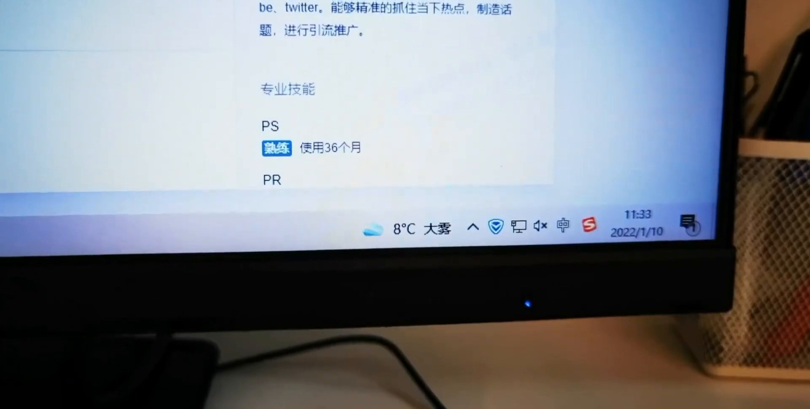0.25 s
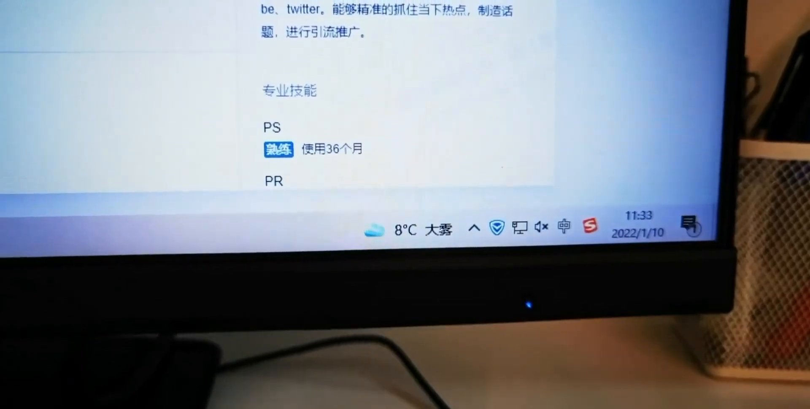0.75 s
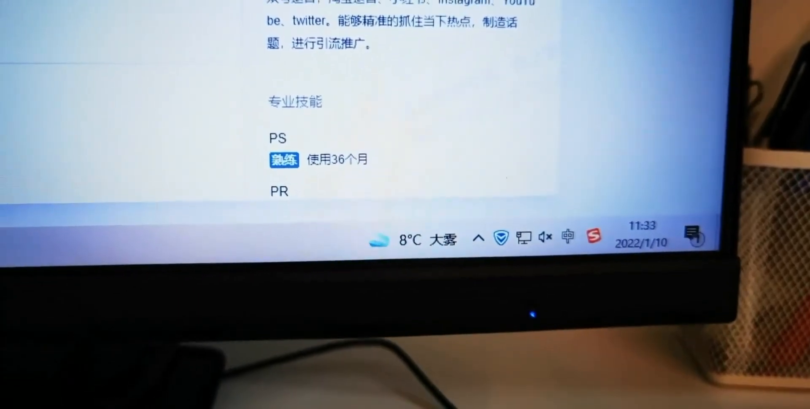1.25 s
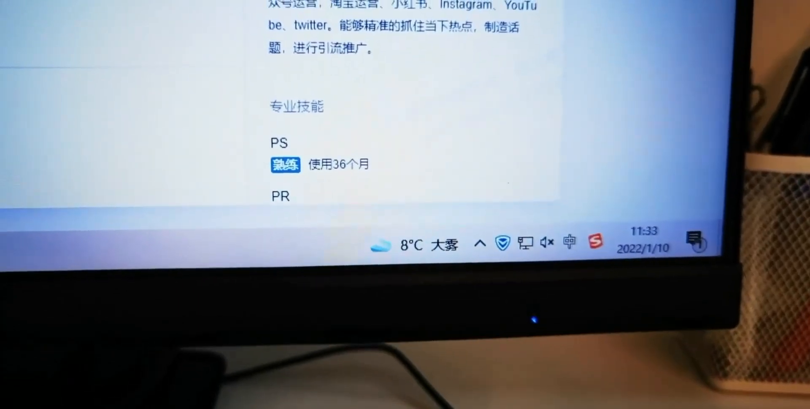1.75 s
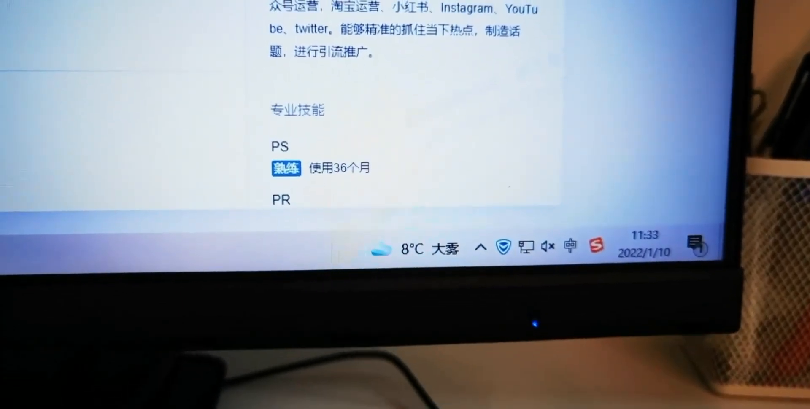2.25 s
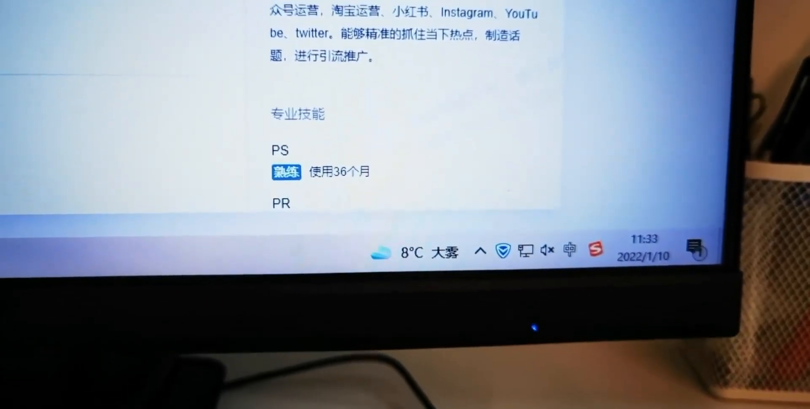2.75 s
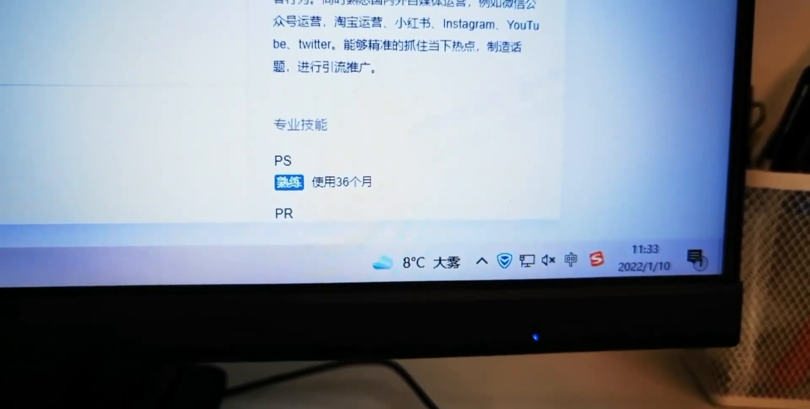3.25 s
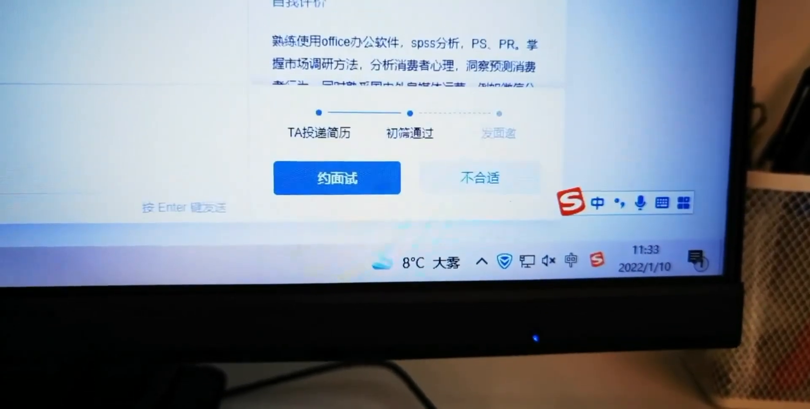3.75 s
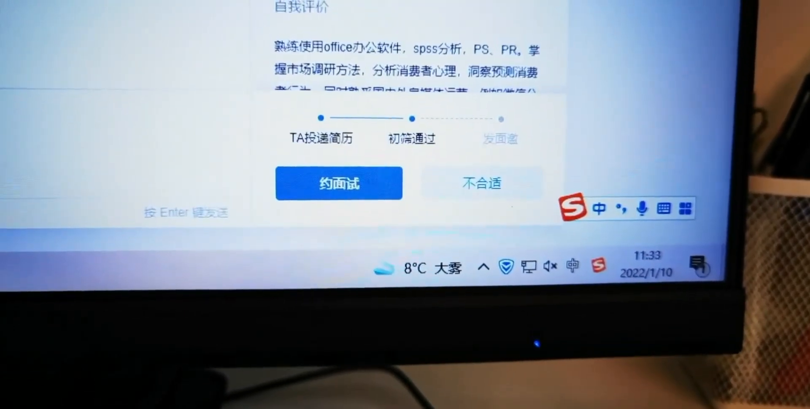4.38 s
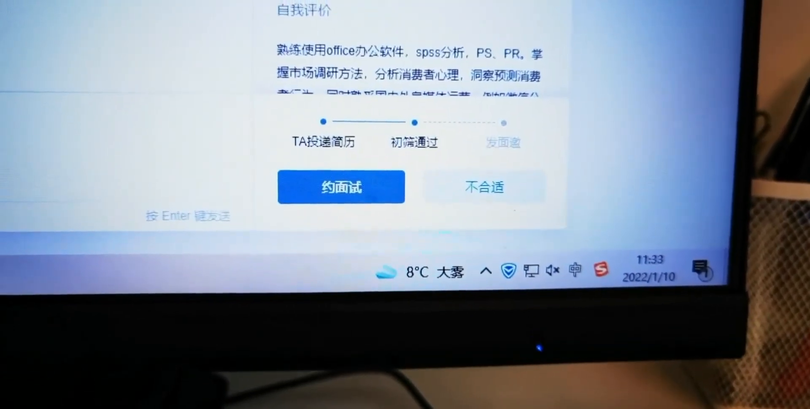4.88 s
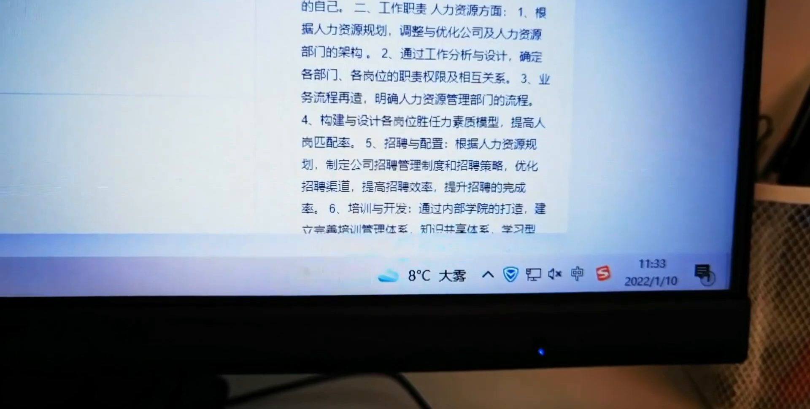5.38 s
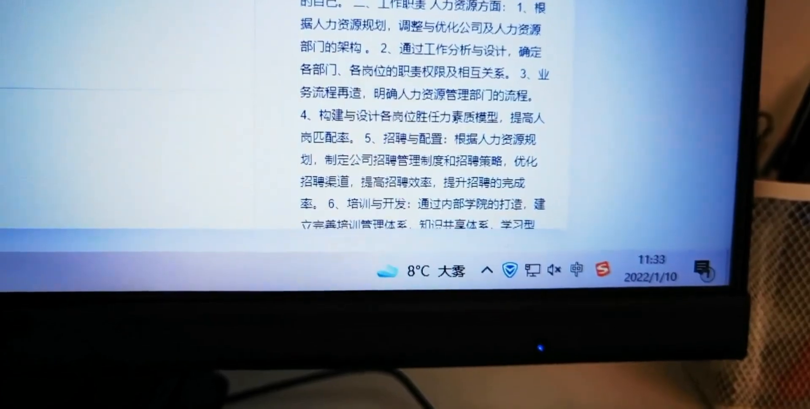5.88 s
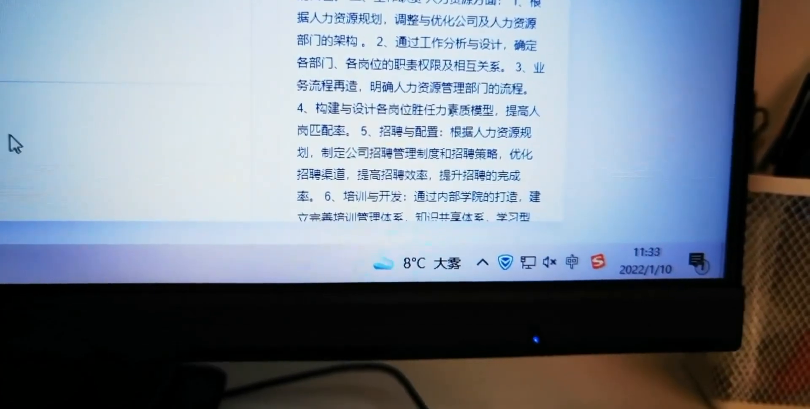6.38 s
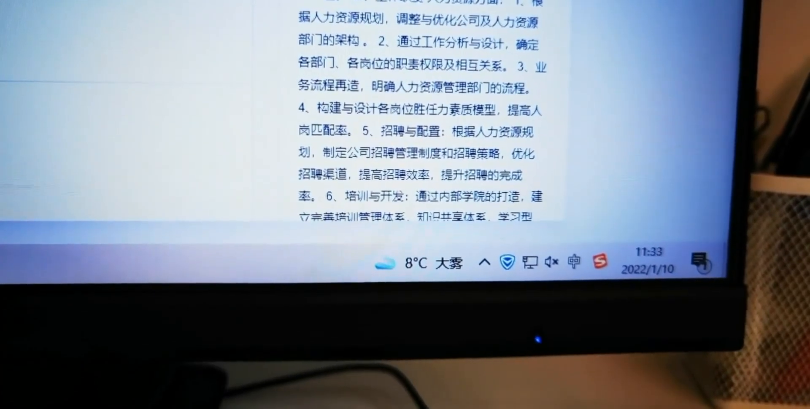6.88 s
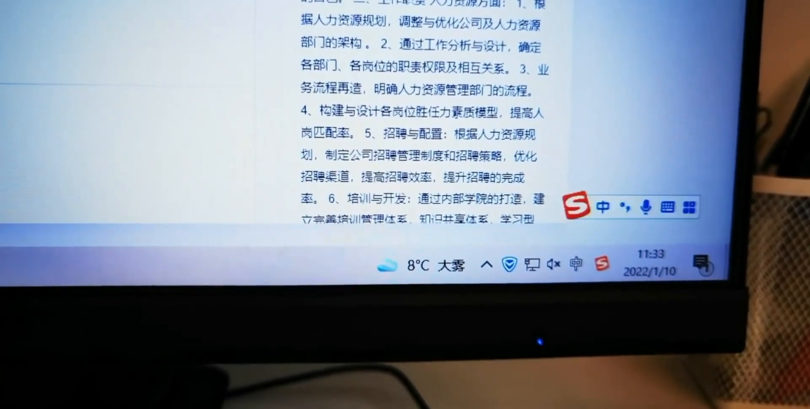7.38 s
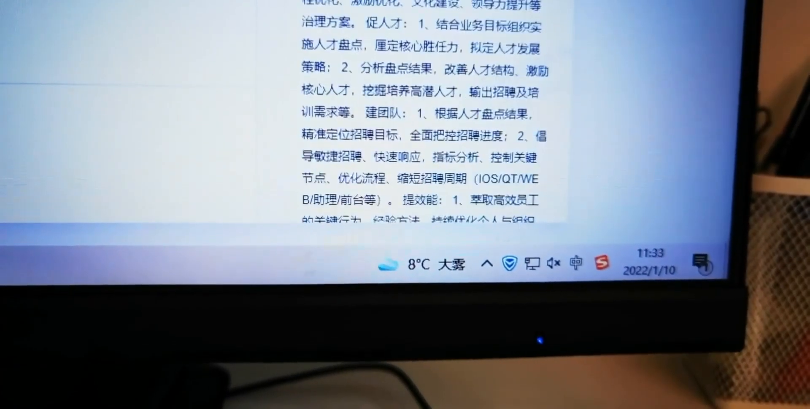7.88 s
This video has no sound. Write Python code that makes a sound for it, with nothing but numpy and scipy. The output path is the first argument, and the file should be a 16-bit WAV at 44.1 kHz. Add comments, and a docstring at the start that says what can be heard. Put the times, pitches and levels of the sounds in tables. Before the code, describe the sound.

Four crisp double-snap mouse clicks, with faint ticks and soft sliding hisses between them, over steady office ventilation.

```python
"""A quiet office, a desk just left of a handheld camera's stereo microphone: a computer mouse is clicked
and nudged. Each click is a press that rings the switch spring and a duller release, among small ticks.
The feet hiss as they slide and squeak once; two soft, airy swells of hiss sit near the centre.
Behind it, ventilation rumbles and hums. A limiter flattens the clicks and ducks the room after them;
the sound drops out briefly near the start."""
import sys
import numpy as np
from scipy import signal
from scipy.fft import rfft, irfft, next_fast_len
from scipy.io import wavfile
from scipy.ndimage import uniform_filter1d, minimum_filter1d, map_coordinates

SR = 44100
rng = np.random.default_rng(int(sys.argv[2]) if len(sys.argv) > 2 else 0)


def unload_wav(signal):
    """Save mono or channel-first audio to the path in sys.argv[1] as 16-bit WAV at rate SR, clipped to [-1, 1]."""
    wavfile.write(
        sys.argv[1],
        SR,
        np.round(np.clip(np.atleast_2d(signal).T, -1, 1) * 32767).astype(np.int16),
    )


N = 358488

# ventilation rumble: f/Hz, relative density/dB
RUMBLE_SPECTRUM = [(12, -48.5), (20, -20), (43, -7), (69, -10.5), (84, -8), (103, -8.5), (129, -6),
                   (162, -7), (399, -13), (464, -19.5), (529, -20.5), (615, -27), (801, -24.5),
                   (1800, -40.5), (2340, -37), (3960, -120)]
# swells of the rumble: middle t/s, half length/s, rise/dB
RUMBLE_SWELLS = [(0.34, 0.085, 2.5), (1.4, 0.22, 5.5), (2.748, 0.36, 1.5)]
# airy hiss of the room: f/Hz, relative density/dB
AIR_SPECTRUM = [(500, -5), (1500, -2), (2400, -1), (3800, -5.5), (5300, -3), (7000, -2), (8800, 4),
                (10000, -2.5), (11000, -7.5), (12000, -28), (15500, -25.5)]
# mains and fan tones: f/Hz, level/dB
HUM_TONES = [(100, -61), (161.8, -63.5), (259, -74.5), (518, -76.5), (551.5, -86), (678.5, -86.5)]
# likeness of the room noise across the microphone pair: f/Hz, correlation
MIC_COHERENCE = [(30, 1), (130, 0.88), (260, 0.88), (400, 0.63), (600, -0.055), (1000, -0.31),
                 (2000, -0.13), (16000, 1)]
# decay of the office: f/Hz, t60/s
ROOM_DECAY = [(500, 0.99), (5000, 0.35), (8500, 0.17), (11000, 0.17), (13000, 0.13), (16000, 0.09)]
# desk, screen and wall reflections: delay/s, level/dB
ROOM_ECHOES = [(.0046, -25), (.0108, -36), (.0135, -31), (.031, -40), (.0425, -38)]
# colour of the room's tail, dipping where the shell radiates poorly: f/Hz, gain/dB
TAIL_COLOUR = [(500, 0), (3000, 2), (4300, -1), (4900, -10), (5300, -11), (5800, -6), (6500, -5),
               (7600, -1), (8400, -2), (9100, 2), (12000, -1), (14500, 2)]

# whistle of a sticking foot: f/Hz, relative level/dB
SQUEAK_TONES = [(5790, 0), (5480, -15), (6490, -11)]
# bright band of a swell, in a slide the feet rubbing on the desk: f/Hz, relative density/dB
BRIGHT_SPECTRUM = [(500, -34), (4200, -27), (4800, -21), (5400, -13), (6500, -14), (7150, -8), (7550, -8),
                   (8100, -3), (8650, 1), (9300, -5.5), (10200, -16), (11200, -24), (12300, -46),
                   (14500, -42), (16000, -50)]
# low band of a swell, in a slide the desk top answering: f/Hz, relative density/dB
LOW_SPECTRUM = [(150, -27), (500, 14.5), (800, 1), (1200, -4.5), (2000, -8), (3000, -7.5), (4500, -10),
                (7200, -5.5), (9500, -5), (11300, -15), (12500, -33), (14500, -21), (16000, -34)]
# mouse slides on the left, and two soft, airy swells near the centre (from 2.024 s and 6.63 s):
# start t/s, end t/s, bright band/dB, low band/dB, left minus right/dB, close reflection/dB
HISS_SWELLS = [(0.3, 0.528, -58, -78, 9, -16), (1.164, 1.417, -52, -77, 13, -16),
               (1.374, 1.493, -53.5, -73, 13, -18), (2.024, 2.49, -52, -63, 5, -6),
               (3.023, 3.33, -52.5, -76, 11, -18), (5.57, 5.784, -60, -74, 6, -16),
               (6.072, 6.363, -53, -73.5, 11, -22), (6.317, 6.567, -57.5, -66, 3.5, -9),
               (6.504, 6.7, -53.5, -67, 7, -9), (6.63, 6.9, -62.5, -64, 3.5, -6),
               (7.1, 7.264, -57, -71, 6, -14), (7.366, 7.541, -63, -87, 5, -14)]

# plastic chatter of the button: f/Hz, relative density/dB
CHATTER_SPECTRUM = [(300, -55), (1600, -56.5), (3000, -36.5), (3900, -37), (4800, -38.5), (6000, -19.5),
                    (7000, -15.5), (8000, 3.5), (8700, 7), (9450, -7.5), (10000, -14), (11300, -26),
                    (12500, -46.5)]
# broad, quickly damped resonance of the shell: f/Hz, relative density/dB
SHELL_SPECTRUM = [(800, -44), (2000, -54), (3700, -48), (4300, -32), (4650, -16), (4900, -4), (5250, 1.5),
                  (5800, -4), (6500, -5), (7300, -5), (8000, -11), (12000, -50)]
# sharp crack of the contact: f/Hz, relative density/dB
CRACK_SPECTRUM = [(2000, -76.5), (7000, -11.5), (9000, -23.5), (10700, 18), (12500, 6), (15500, -6)]
# hollow thud of the body on the desk: f/Hz, relative density/dB
THUD_SPECTRUM = [(200, -17.5), (480, -4), (750, 1), (1200, -5.5), (2200, -5), (3000, -4.5), (3600, -4.5),
                 (4300, -13), (8000, -48.5)]
# presses that ring the case: t/s, level/dB, f/Hz
CASE_TONES = [(1.002, -60, 3340), (5.032, -55, 2930)]
# button going down; shell, crack and thud are relative to the chatter:
# t/s, peak/dB, swell/s, shell/dB, crack/dB, thud/dB, spring f/Hz, lever f/Hz, left minus right/dB
BUTTON_PRESSES = [(1.0016, 0.5, 0.0011, -26, -48, -43, 8300, 5480, 16),
                  (2.9237, -2.5, 0.00084, -12, -26, -36, 8410, 6050, 6.5),
                  (5.029, -4.5, 0.0014, -14.5, -32, -35, 8330, 5240, 10.5),
                  (7.0094, -0.5, 0.0012, -17, -22, -42.5, 8300, 5220, 14)]
# button coming up: columns as BUTTON_PRESSES
BUTTON_RELEASES = [(1.0858, -2.5, 0.00077, -6.5, -24, -65, 9140, 5070, 9.5),
                   (3.0152, -5.5, 0.00097, -3.5, -15, -57, 9350, 4790, 8),
                   (5.1242, -1.5, 0.00097, -11, -20, -59, 8400, 4810, 11.5),
                   (7.1170, 0, 0.00064, -7, -18.5, -54, 8960, 5280, 9.5)]
# small plastic ticks: light taps, a tick just before one press, a faint echo after another;
# columns as BUTTON_PRESSES
PLASTIC_TICKS = [(.2705, -42, 0.0014, -9, -28, -32, 8480, 5560, 10),
                 (.4723, -33, 0.00066, -4, -25, -18, 8900, 6240, 11),
                 (1.1550, -40, .0008, 2, -15, -27, 8600, 5400, 12),
                 (1.3355, -38, .0006, -14, -25, -28, 8700, 5500, 10),
                 (1.3428, -29, 0.00024, -14, -2, -28, 8700, 6340, 18),
                 (1.3455, -28, 0.0008, -16, -22, -33, 8980, 6500, 14),
                 (1.3792, -36, .0004, -18, -31, -34, 8800, 5500, 14),
                 (1.4005, -40.5, .0004, -10, -30, -28, 8700, 5300, 12),
                 (1.5648, -28, 0.00091, -8, -42, -27, 8560, 6030, 8.5),
                 (1.9588, -52, 0.00061, -9, -29, -25, 8700, 5530, 5),
                 (2.9217, -23, .0007, 4, -30, -25, 7900, 5300, 12),
                 (4.5450, -51, 0.00059, -8, -22, -10, 9400, 5300, 1),
                 (4.7763, -46, 0.00035, -1, -18, 6, 8500, 5500, 3),
                 (5.7270, -38.5, 0.0016, -9, -40, -19, 7920, 5300, 7),
                 (6.0108, -45.5, .00077, -11, -26, -12.5, 9040, 5500, 9),
                 (6.5712, -17, 0.00075, -10.5, -34, -35, 8700, 4970, 9.5),
                 (7.0516, -27, 0.00092, -32, -34.5, -35, 8330, 5400, 16),
                 (7.2180, -33.5, 0.0014, -7.5, -18, -24, 8760, 5400, 8),
                 (7.4252, -45.5, 0.00041, -14, -30, -22, 8710, 5500, 8),
                 (7.8220, -52, 0.0007, -20, -25, -19.5, 8880, 5400, 5)]
# mouse set down on the desk: columns as BUTTON_PRESSES
DESK_KNOCKS = [(3.0900, -27.5, 0.001, 12, -38, -12, 7900, 5800, 12),
               (6.3946, -24, 0.0009, 3.5, -20, -15, 7800, 6530, 14)]
# brief dropout of the whole sound: t/s, gain/dB
DROPOUT_CURVE = [(.058, -4), (.064, -15), (.08, -32), (.1, -62), (.23, -62), (.242, -24), (.27, -11),
                 (.31, 0)]


def amp(db):
    """Decibels to gain."""
    return 10 ** (np.asarray(db) / 20)


def unit(x):
    """Scales each channel to rms 1."""
    return x / np.sqrt(np.mean(x ** 2, axis=-1, keepdims=True) + 1e-20)


def at_hz(points, hz):
    """Reads a curve on a log-frequency axis."""
    f, value = np.transpose(points)
    return np.interp(np.log(hz + 1), np.log(f + 1), value)


def colour(x, spectrum):
    """Filters x by a spectrum in dB."""
    size = next_fast_len(x.shape[-1], True)
    gain = amp(at_hz(spectrum, np.fft.rfftfreq(size, 1 / SR)))
    return irfft(rfft(x, size) * gain, size)[..., :x.shape[-1]]


def drift(hz):
    """Slow random wander of rms 1, up to about hz."""
    size = next_fast_len(N, True)
    lowpass = np.exp(-(np.fft.rfftfreq(size, 1 / SR) / hz) ** 2)
    return unit(irfft(rfft(rng.standard_normal(size)) * lowpass, size)[:N])


def add(mix, s, sound):
    """Mixes a stereo sound in at time s."""
    part = mix[:, max(round(s * SR), 0):][:, :sound.shape[1]]
    part += sound[:, :part.shape[1]]


def fade(db_per_s):
    """Gain that sinks steadily in dB and passes 1 halfway through."""
    t = np.arange(N) / SR
    return amp(db_per_s * (t.mean() - t))


def room_noise(spectrum):
    """Noise from all around: alike at both microphones in the bass, much less so in the midrange."""
    left, other = rfft(rng.standard_normal((2, N)))
    coherence = np.clip(at_hz(MIC_COHERENCE, np.fft.rfftfreq(N, 1 / SR)), -1, 1)
    right = coherence * left + np.sqrt(1 - coherence ** 2) * other
    return unit(colour(irfft(np.array([left, right]), N), spectrum))


def ventilation(rumble_db=-57, flutter_db=1.78, hiss_db=(-69, -70.5)):
    """Room tone: a fluttering rumble of air under a thin hiss, both slowly sinking."""
    t = np.arange(N) / SR
    swell_db = sum(db * np.exp(-((t - s) / half) ** 2) for s, half, db in RUMBLE_SWELLS)
    rumble = room_noise(RUMBLE_SPECTRUM) * amp(rumble_db + swell_db + flutter_db * drift(hz=32))
    hiss = room_noise(AIR_SPECTRUM) * amp(hiss_db)[:, None]
    return rumble * fade(db_per_s=0.5) + hiss * fade(db_per_s=0.76)


def hum(waver_db=2, wander_rad=0.92):
    """Mains and fans hum in the background, each tone wavering a little as they slowly sink."""
    t = np.arange(N) / SR
    tones = np.zeros(N)
    for hz, db in HUM_TONES:
        level = amp(db + waver_db * drift(hz=4))
        tones += level * np.sin(2 * np.pi * hz * t + wander_rad * drift(hz=8.7))
    return np.sqrt(2) * tones * fade(db_per_s=0.55)


def room_response(tail_db=-16, build_s=0.004):
    """A few hard reflections reach the microphone over a diffuse tail whose treble dies first."""
    hz, t, noise = signal.stft(rng.standard_normal((2, SR // 2)), SR, nperseg=256)
    decay = amp(-60 * t / at_hz(ROOM_DECAY, hz)[:, None])
    tail = signal.istft(noise * decay, SR, nperseg=256)[1]
    tail *= 1 - np.exp(-np.arange(tail.shape[1]) / SR / build_s)
    tail *= amp(tail_db) / np.linalg.norm(tail[0])
    response = colour(tail, TAIL_COLOUR)
    for delay_s, db in ROOM_ECHOES:
        add(response, delay_s, amp(db) * rng.choice([-1, 1], (2, 1)))
    return response


def office_reverb(direct, right_db=-3, positions=4):
    """The room answers the mouse; as mouse and microphone shift, its reflections fall differently."""
    out, start = np.zeros((2, N)), 0
    for stretch in np.array_split(direct.sum(0), positions):
        add(out, start / SR, signal.fftconvolve(stretch[None], room_response(), axes=1))
        start += len(stretch)
    return out * amp([[0], [right_db]])


def foot_squeak(at_s=3.668, level_db=-63.5, fade_s=0.037, right_db=-4,
                wander_rad=1.2, flutter_db=3, flutter_hz=180):
    """A sticking foot whistles unsteadily, swelling and dying away."""
    t = np.arange(N) / SR
    whistle = sum(amp(db) * np.sin(2 * np.pi * hz * t + wander_rad * drift(flutter_hz))
                  for hz, db in SQUEAK_TONES)
    swell = np.exp(-abs(t - at_s) / fade_s) * amp(level_db + flutter_db * drift(flutter_hz))
    return unit(whistle) * swell * amp([[0], [right_db]])


def grainy_noise(grit_per_s=1500, grit_db=-4, spread_db=2.3, grain_db=-3.5, waver_db=0.7):
    """Rough, wavering noise: in a slide, the feet catching on grit under an uneven hand."""
    catches = rng.random(N) < grit_per_s / SR
    grit = catches * amp(spread_db * np.minimum(rng.exponential(1, N), 4))
    noise = rng.standard_normal((2, N))
    roughness = amp(grain_db * drift(hz=120)) + amp(grit_db) * unit(grit)
    return noise * roughness * amp(waver_db * drift(hz=16))


def slides_and_airy_swells(echo_s=0.00101, echo_wander=0.028, arch_power=1.13):
    """Arches of hiss: mouse feet rubbing the desk on the left, two soft, airy swells near the centre."""
    t, out = np.arange(N) / SR, np.zeros((2, N))
    noise = grainy_noise()
    bright, low = unit(colour(noise, BRIGHT_SPECTRUM)), unit(colour(noise, LOW_SPECTRUM))
    # a shifting reflection from a nearby surface ripples the hiss
    delay_samples = SR * echo_s * (1 + echo_wander * drift(hz=5))
    echo = np.array([map_coordinates(side, [np.arange(N) - delay_samples], order=3) for side in bright])
    for start, end, bright_db, low_db, left_db, echo_db in HISS_SWELLS:
        during = (t > start) & (t < end)
        arch = np.sin(np.pi * (t[during] - start) / (end - start))  # in a slide, the hand's speed
        hiss = unit(bright[:, during] + amp(echo_db) * echo[:, during])
        hiss *= amp([[bright_db], [bright_db - left_db]])
        out[:, during] += arch ** arch_power * (hiss + low[:, during] * amp(low_db))
    return out


def case_rings(t60_s=0.06, right_db=-3):
    """A firm press sets the hollow case ringing briefly."""
    t, out = np.arange(SR // 5) / SR, np.zeros((2, N))
    for s, db, hz in CASE_TONES:
        ring = amp(db - 60 * t / t60_s) * np.sin(2 * np.pi * hz * t)
        add(out, s, ring * amp([[0], [right_db]]))
    return out


def blow(t, swell_s):
    """Force of one impact: rises from t = 0 to 1 at swell_s, then dies away."""
    age = np.maximum(t, 0) / swell_s
    return age * np.exp(1 - age)


def mouse_snaps(rows, spring_db, lever_db, creak_db=-6, bounce_db=-22, shell_pitch=1,
                creak_s=0.001, bounce_s=0.0032):
    """Plastic chatters and cracks, rings spring, lever and shell, thuds on the desk and bounces once."""
    out, lead_s = np.zeros((2, N)), 256 / SR
    t = np.arange(2048) / SR - lead_s
    shell = [(hz * shell_pitch, db) for hz, db in SHELL_SPECTRUM]
    creak = amp(creak_db) * np.exp(-abs(t) / creak_s)  # begins a moment before the snap
    for s, peak_db, swell_s, shell_db, crack_db, thud_db, spring_hz, lever_hz, left_db in rows:
        force = blow(t, swell_s) + amp(bounce_db) * blow(t - bounce_s, swell_s)
        parts = [(CHATTER_SPECTRUM, 0), (shell, shell_db),
                 (CRACK_SPECTRUM, crack_db), (THUD_SPECTRUM, thud_db)]
        burst = sum(amp(db) * unit(colour(rng.standard_normal((2, len(t))) * (force + creak), spectrum))
                    for spectrum, db in parts)
        # the finger damps spring and lever as quickly as the chatter
        ring = sum(amp(db) * unit(force * np.sin(2 * np.pi * (hz * t + rng.random((2, 1)))))
                   for hz, db in [(spring_hz, spring_db), (lever_hz, lever_db)])
        snap = unit(burst + ring) * np.sqrt(np.mean(force ** 2) / 2)
        add(out, s - lead_s, snap * amp([[peak_db], [peak_db - left_db]]))
    return out


def scene():
    """At the microphone: the mouse close on the left, the office and its ventilation behind."""
    # the pressing finger loads the shell and lowers its resonance
    mouse = mouse_snaps(BUTTON_PRESSES, spring_db=4, lever_db=-25.5, creak_db=-18,
                        bounce_db=-15, shell_pitch=0.97)
    mouse += mouse_snaps(BUTTON_RELEASES, spring_db=0.5, lever_db=-19, creak_db=-8)
    mouse += mouse_snaps(PLASTIC_TICKS, spring_db=-5.5, lever_db=-16.5)
    mouse += mouse_snaps(DESK_KNOCKS, spring_db=7.5, lever_db=1)
    mouse += case_rings()
    background = ventilation() + hum()
    return background + office_reverb(mouse) + slides_and_airy_swells() + foot_squeak() + mouse


def record(dry, ceiling_db=-8.1, hold_s=0.027, recovery_db_per_s=230, cutoff_hz=15900):
    """After the microphone: a look-ahead limiter that holds and recovers, a brief dropout, a low-pass."""
    t, hold = np.arange(N) / SR, int(hold_s * SR)
    over_db = np.maximum(20 * np.log10(abs(dry).max(0) + 1e-9) - ceiling_db, 0)
    held_db = -minimum_filter1d(-over_db, hold, origin=hold // 2 - 100)  # looks 100 samples ahead
    recovery_db = t * recovery_db_per_s
    duck_db = uniform_filter1d(np.maximum.accumulate(held_db + recovery_db) - recovery_db, size=32)
    dropout = amp(np.interp(t, *np.transpose(DROPOUT_CURVE)))
    lowpass = signal.firwin(255, cutoff_hz, window=("kaiser", 9), fs=SR)
    return signal.oaconvolve(dry * amp(-duck_db) * dropout, lowpass[None], "same")


dry = scene()
out = record(dry)
unload_wav(out)
```